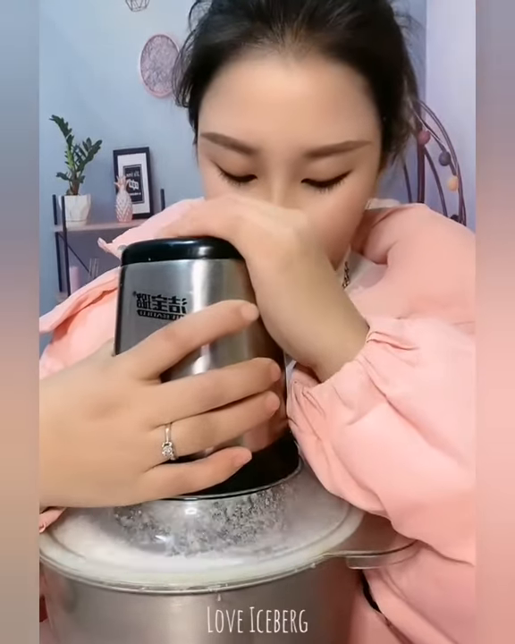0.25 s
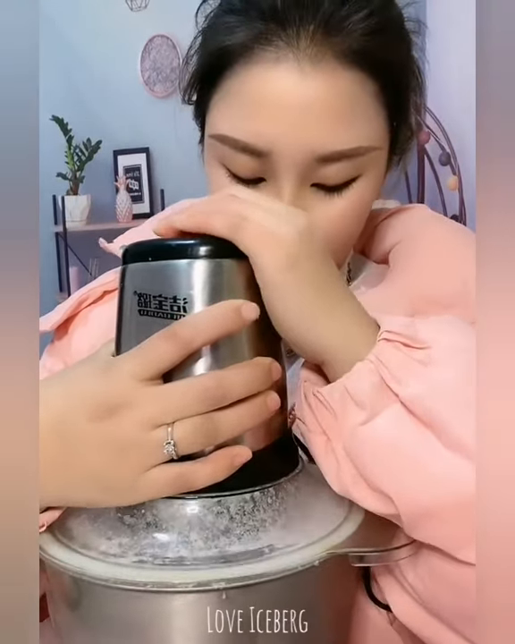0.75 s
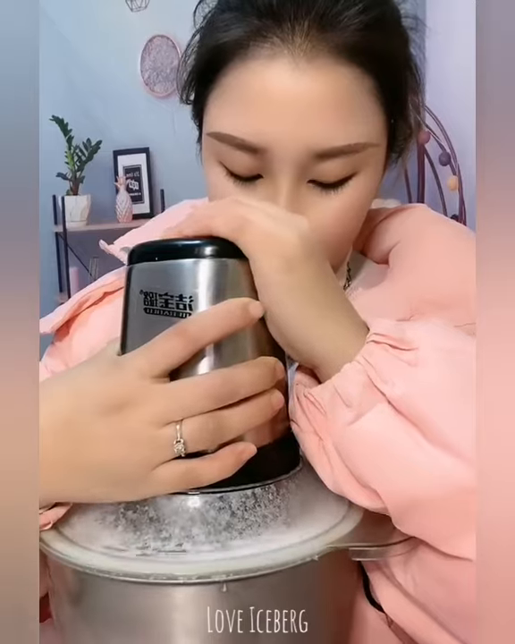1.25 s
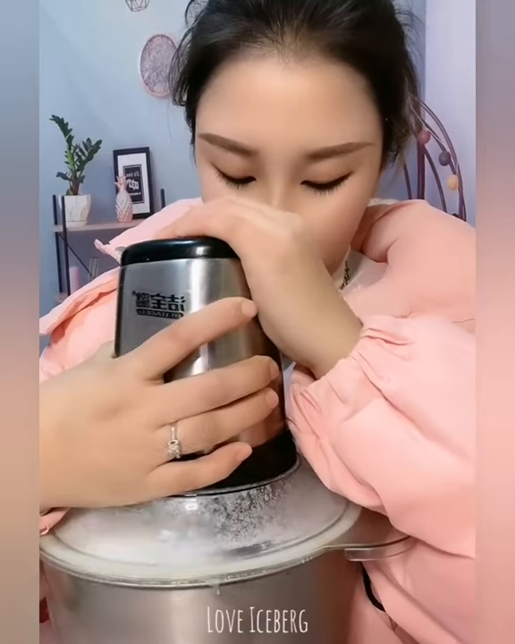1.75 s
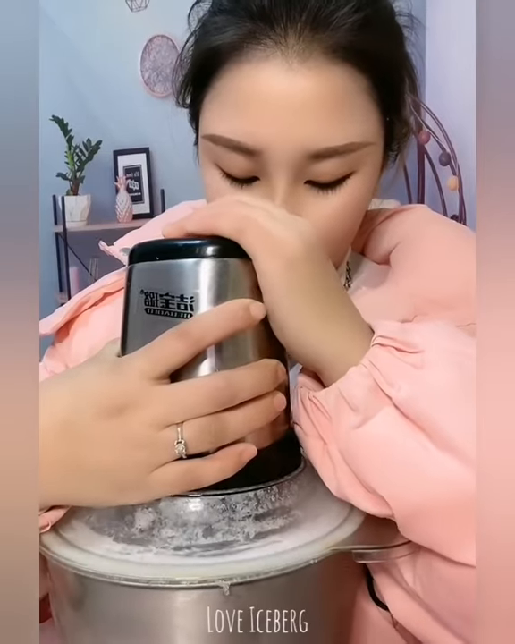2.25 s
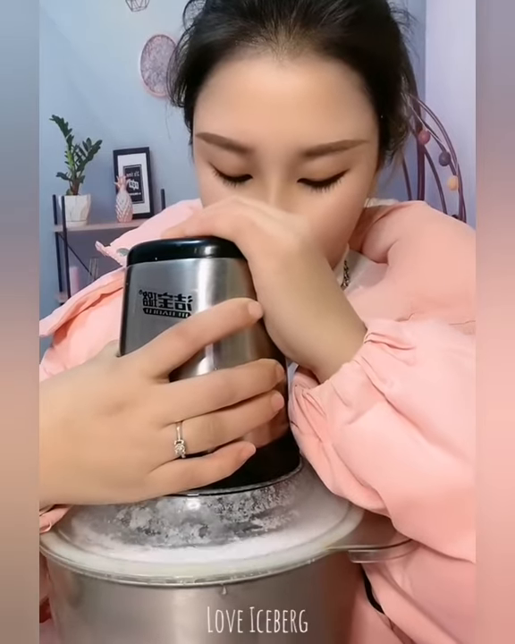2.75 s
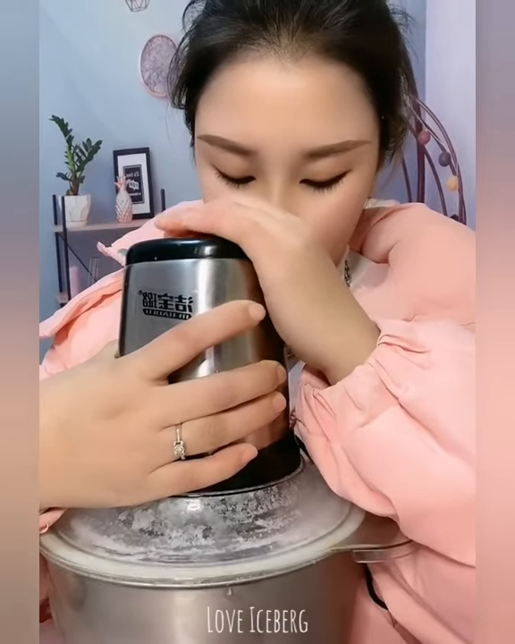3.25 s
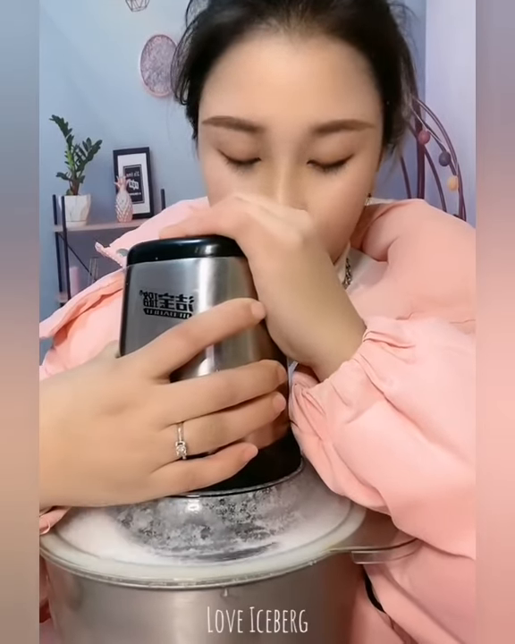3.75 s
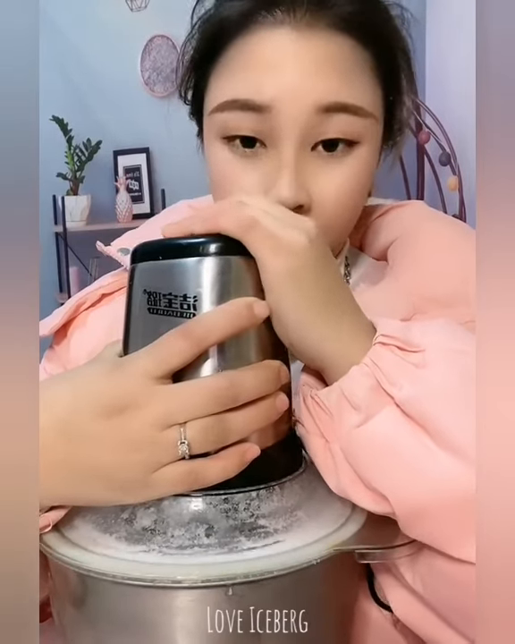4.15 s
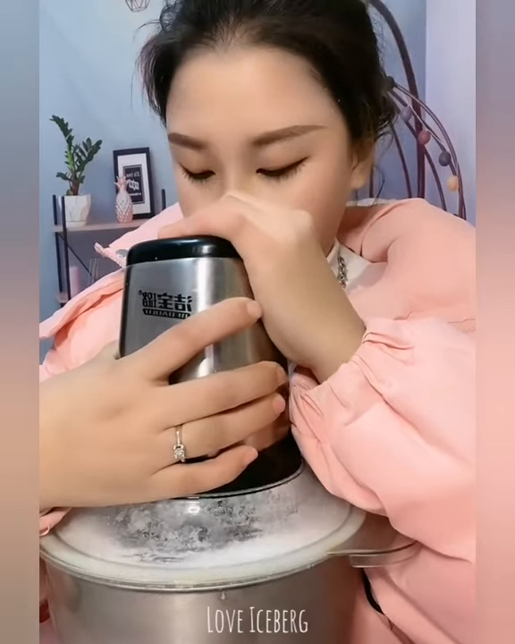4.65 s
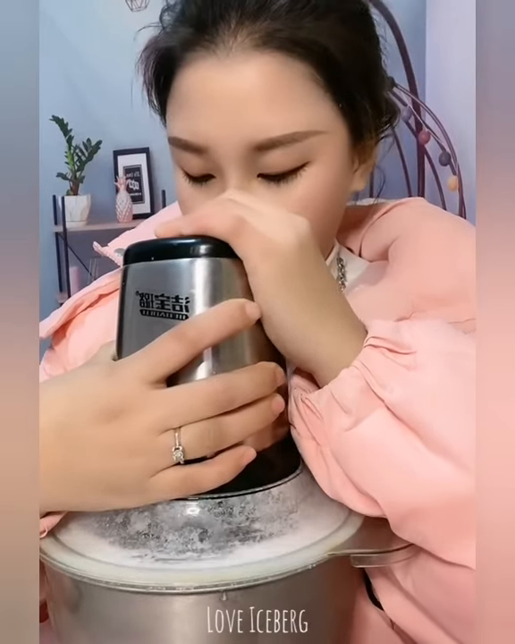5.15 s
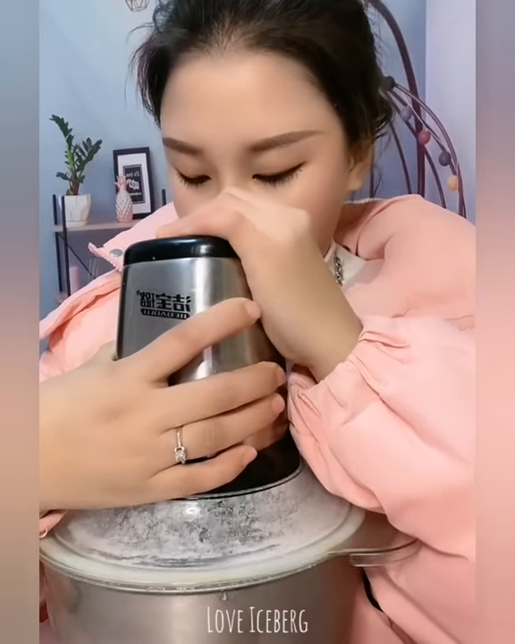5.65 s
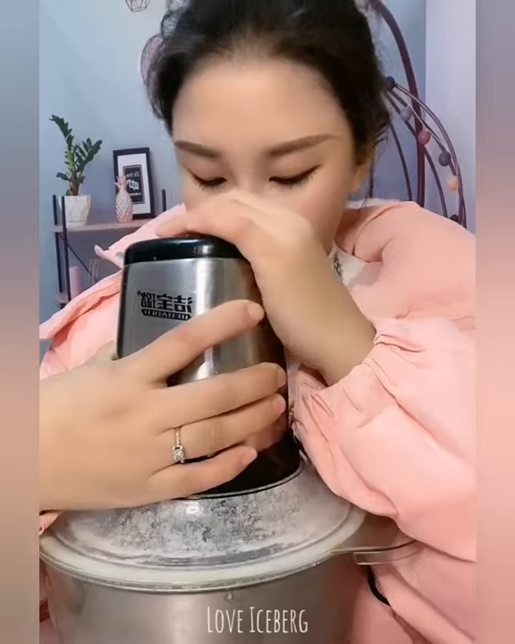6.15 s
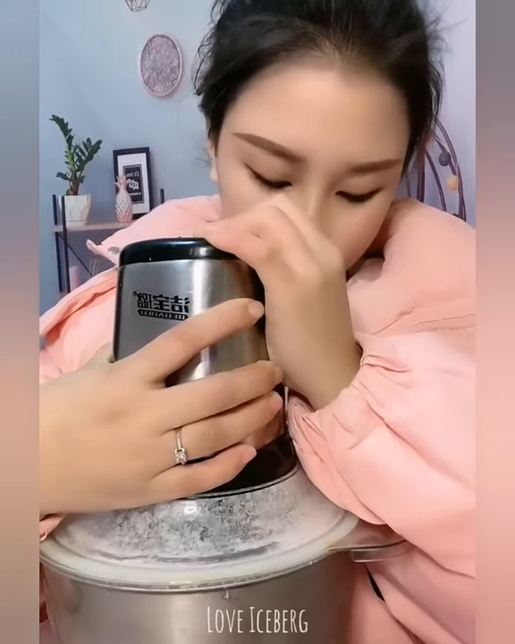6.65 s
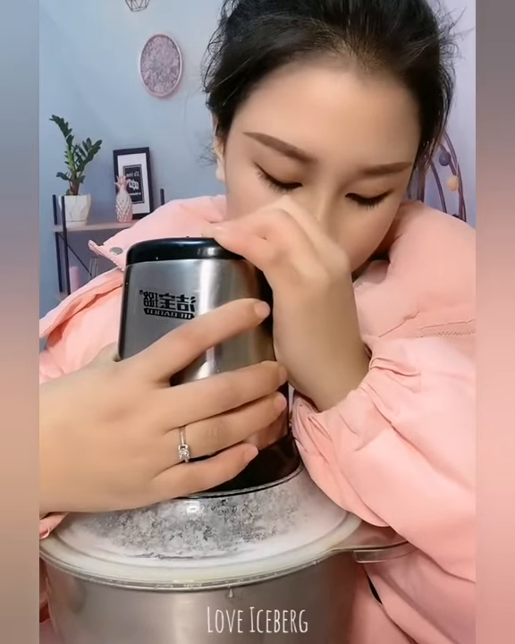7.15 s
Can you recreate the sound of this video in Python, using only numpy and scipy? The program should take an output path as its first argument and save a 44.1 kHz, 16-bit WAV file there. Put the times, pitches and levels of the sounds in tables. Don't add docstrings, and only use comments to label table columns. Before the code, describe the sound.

A faint tick of settling ice in a quiet room, then at 0.1 s an electric chopper bites into ice in a steel bowl: a sharp crack, a knock, and a loud coarse roar, fluttering about fifty times a second, until 0.6. More presses follow at 0.9-1.3, 1.7-2.2, 2.6-3.1, 3.5-4.1, 4.5-5.2 and 5.5-6.1, with the longest from 6.4 to 7.3. Each jolts in suddenly, dips briefly and swells as the high motor whine climbs and sinks beneath the grinding. Bowl and lid ring harshly; lumps thud on the wall and brittle cracks spit through. After each release the blades growl down for 0.1-0.2 s, last pieces crack, and a low bowl hum near 200 Hz dies quickly. Loose ice slides softly around 1.6, 2.5 and 3.4. The close microphone overloads on peaks; the final run-down fades toward room quiet.

```python
import sys
import numpy as np
from scipy import signal
from scipy.fft import rfft, irfft
from scipy.io import wavfile
from scipy.ndimage import uniform_filter1d

SR = 44100
rng = np.random.default_rng(int(sys.argv[2]) if len(sys.argv) > 2 else 0)


def to_wav(sig):
    pcm = np.clip(np.atleast_2d(sig), -1, 1) * 32767
    pcm = np.round(pcm).astype(np.int16)
    wavfile.write(sys.argv[1], SR, pcm.T)


def how_loud(loudness_db):
    steps = np.asarray(loudness_db, float) / 20
    return 10 ** steps


N = 326781

# on/s, off/s, blades stall/s, load/dB, ice against the lid/dB
PULSES = [
    (-.9, -.4, -.17, 2, 0),
    (.125, .62, .75, -.5, -3),
    (.934, 1.31, 1.422, -1, .5),
    (1.713, 2.2, 2.41, -.3, .3),
    (2.587, 3.08, 3.285, 0, .5),
    (3.508, 4.14, 4.305, 0, -1),
    (4.535, 5.165, 5.35, .5, -2),
    (5.51, 6.1, 6.255, .3, -2.5),
    (6.44, 7.283, 7.45, .5, .7),
]
# f/Hz, width/Hz, level/dB
BODY = [(266, 13, 4.5), (334, 41, 6), (453.4, 76, 7), (550, 23, 3.5), (705, 26, 5.5), (772, 80, 7),
        (1113, 87, 11), (1123, 66, 3), (1260, 70, 10), (1667, 136, 5), (1985, 230, 6.5), (3240, 50, 7),
        (3480, 120, 4), (4270, 130, 4.5), (4950, 90, 5.5), (5890, 630, -2.5)]
# f/Hz, level/dB per Hz
COLOUR = [(15, -75), (25, -31), (102, -13), (161, -14.5), (325, -4.5), (638, -10.5), (770, -5), (982, -13),
          (1150, -9.5), (2150, -16.5), (2810, -15.5), (5680, -16), (10800, -33), (15800, -56.5)]
# t/s, crack/dB, sharpness/dB, knock/dB, knock/Hz
BITES = [(.129, -.5, -10, 7, 590), (.937, -5, -6, 8.5, 485), (1.7165, 4, -11, 2, 760),
         (2.5905, -2.5, -16, 6, 790), (3.511, -4, -4.5, 4, 334), (4.5361, 5, -5, 2.5, 258),
         (5.5124, -2, -10, 5, 444), (6.4408, -14, -18, 1, 770)]
# t/s, peak level/dB, f/Hz, sharpness/dB
CRACKS = [(.1123, -17, 5400, -15), (.2448, -10, 4220, -16), (.6802, -5.5, 4320, -12),
          (.7386, 0, 3030, -11.5), (.9708, 2.5, 3400, -14), (1.0166, -9, 2470, -3),
          (1.3414, -5.5, 3320, -13), (1.411, 4.5, 4470, -13.5), (1.452, -11, 6440, -11),
          (2.274, 0, 4370, -10), (2.36, -2.5, 3700, -20), (2.4026, -1.5, 3130, -11),
          (2.6235, -2.5, 4120, -16), (2.6524, -.5, 4900, -17), (2.796, -7, 2770, -17), (3.2, -9, 5000, -8),
          (3.256, -5, 3610, -7.5), (3.278, -8, 5000, -8), (3.668, -9, 5000, -9), (4.2583, -2, 4680, -13),
          (4.2778, 1, 4460, -11.5), (4.593, -3, 4970, -16), (4.6314, -6, 4260, -18), (4.995, -3, 3480, -21),
          (5.122, -9, 6000, -7), (5.22, -9, 6000, -7), (5.3296, -3.5, 3480, -8.5), (5.5054, -5, 2760, -10),
          (6.2434, 2, 5170, -14), (6.486, 3, 3140, -18)]
# t/s, peak level/dB, f/Hz, sharpness/dB
TICKS = [(.0535, -24, 2100, -21), (1.546, -5, 1600, -31), (1.5683, -7, 2200, -29), (1.667, -7, 1600, -31),
         (1.6915, -28, 3390, -5), (2.4932, -6, 2300, -28), (3.397, -7, 2000, -20), (3.4685, -32, 4400, -10),
         (4.5134, -27, 3400, -16), (5.4844, -33, 3500, -9), (6.416, -24, 900, -30)]


def rms_one(x):
    return x / np.sqrt(np.mean(x ** 2) + 1e-20)


def drift(rate_hz):
    r = np.exp(-2 * np.pi * rate_hz / SR)
    slow = signal.lfilter([1], [1, -2 * r, r * r], rng.standard_normal(N + SR))
    return rms_one(slow[SR:])


def resonance(x, hz, width_hz):
    r = np.exp(-np.pi * width_hz / SR)
    poles = [1, -2 * r * np.cos(2 * np.pi * hz / SR), r * r]
    return signal.lfilter([(1 - r * r) / 2, 0, (r * r - 1) / 2], poles, x)


def low_pass(x, order, top_hz):
    return signal.sosfilt(signal.butter(order, top_hz, fs=SR, output="sos"), x)


def band(x, low_hz, high_hz):
    return rms_one(signal.sosfilt(signal.butter(3, [low_hz, high_hz], "band", fs=SR, output="sos"), x))


def coloured(x, spectrum, peaks=()):
    size = 2 ** 13
    hz = np.maximum(np.arange(size // 2 + 1) * SR / size, 1)
    points = np.array(spectrum)
    level_db = np.interp(np.log(hz), np.log(points[:, 0]), points[:, 1])
    for centre_hz, width_hz, db in peaks:
        level_db += db / (1 + (2 * (hz - centre_hz) / width_hz) ** 2)
    cepstrum = irfft(np.log(how_loud(level_db)))
    cepstrum[1:size // 2] *= 2
    cepstrum[size // 2 + 1:] = 0
    response = irfft(np.exp(rfft(cepstrum)))
    return signal.fftconvolve(x, response)[:N]


def blade_blows(uneven, spread_db, fade_s):
    blade_hz = 48.23
    passes = np.cumsum(blade_hz * (1 + uneven * drift(13))) / SR
    kicks = np.diff(np.floor(passes), prepend=0) > 0
    force = kicks * how_loud(spread_db * rng.standard_normal(N))
    r = np.exp(-1 / (fade_s * SR))
    return rms_one(signal.lfilter([1], [1, -2 * r, r * r], force))


def bowl_hum():
    hz, width_hz = 202.3, 8.4
    hum = resonance(resonance(rng.standard_normal(N), hz, width_hz), hz, 3 * width_hz)
    return hum / np.sqrt(uniform_filter1d(hum ** 2, size=3000) + 1e-12)


def churn():
    # f/Hz, width/Hz, level/dB
    ridges = [(3480, 110, -5), (4270, 130, -5), (1650, 120, -8)]
    ridge_patchy_db, lurch_db = 5, 1.5
    dulling, dull_hz = .4, 560
    bowl_db, lid_db, crunch_db, swish_db, rumble_db, hum_db = churn_levels()

    blows = blade_blows(uneven=.3, spread_db=2.0, fade_s=0.003)
    grain_force = how_loud(4.4 * np.minimum(rng.exponential(1, N), 5))
    grains = (rng.random(N) < 4000 / SR) * grain_force * rng.choice([-1, 1], N)
    grind = rng.standard_normal(N) + 0.46 * rms_one(grains)
    lumps = coloured((1.9 + blows) * grind, COLOUR, BODY)
    slush = coloured((2.45 + blows) * grind, COLOUR, BODY)

    dull_db = dulling * np.clip(crunch_db + 20, -18, 0)
    bowl = band(lumps, 225, 980)
    belly = low_pass(bowl, 1, dull_hz)
    bowl = how_loud(-dull_db / 2) * belly + how_loud(dull_db) * (bowl - belly)
    lid = band(lumps, 980, 1420)
    rumble = how_loud(lurch_db * drift(4)) * band(lumps, 25, 160)
    crunch, swish = band(slush, 1420, 6800), band(slush, 6800, 17000)
    ringing = np.zeros(N)
    for hz, width_hz, db in ridges:
        ringing += how_loud(db + dull_db + ridge_patchy_db * drift(3)) * resonance(crunch, hz, width_hz)
    crunch = crunch + ringing

    out = how_loud(bowl_db - 0.5) * bowl + how_loud(lid_db + 3.4) * lid
    out += how_loud(rumble_db + 1.0) * rumble + how_loud(hum_db - 2.2) * bowl_hum()
    return out + how_loud(drift(12)) * (how_loud(crunch_db - 1) * crunch + how_loud(swish_db) * swish)


def churn_levels():
    # running/dB, first jolt/dB, slump after it/dB, change by release/dB
    driven = [
        (-14, 3, -5, .4),
        (-17.2, 1.5, -2.5, -1.3),
        (-18.3, 3, -4, -.6),
        (-26.3, .5, -1.5, -3),
        (-29, -8, 5, -1.5),
        (-29.5, -3, 5, -2.5),
    ]
    # change while coasting/dB, drop at the stall/dB, fall/dB per s, rest/dB
    released = [
        (-3, -3, -150, -52),
        (-7, -11, -130, -60),
        (-6, -10.5, -60, -57),
        (-3.5, -7.5, -40, -76),
        (4, -.5, -70, -50),
        (10.5, -.5, -70, -52),
    ]
    # bowl hum at the stall/dB, table rumble/dB, fineness of the ice/dB, settling speed
    endings = [(-2, -10, 0, 1.1), (1, 2, -.3, .8), (-5, -1, -.5, .85), (3, -1, 0, 1.1), (-3, -3, 0, 1.15),
               (-4, 0, 0, 1.0), (-4, 3, .6, 1.0), (3, -1, 0, 1.25), (-2, -2, -1.8, 1.1)]
    # t/s, length/s, level/dB
    slides = [(1.555, .035, -12), (1.66, .025, -16), (2.52, .04, -14), (3.385, .025, -14)]
    slide_colour_db = [-2.5, -4, -6, -25, -30, -30]
    stand_db = [0, -2, -10, -20, -3, 0]
    stand_s, drop_s = .115, .022
    lead_s, lead_db, slump_s, run_up_s = .013, -27, .035, .1
    let_go_s, let_go_share = .03, .4

    t, out = np.arange(0, N, 20) / SR, []
    for k, ((run, jolt, slump, change), (coast, drop, fall, rest)) in enumerate(zip(driven, released)):
        power = np.full(len(t), how_loud(2 * rest))
        for (on, off, stall, load_db, lid_db), (hum_db, rumble_db, fine_db, settle) in zip(PULSES, endings):
            own_db = [0, lid_db, fine_db, fine_db, rumble_db, 0][k]
            let_go_db = change + let_go_share * coast
            last_db = change + coast + hum_db * (k == 5)
            times = [on - 2 * lead_s, on - lead_s, on - .004, on + .001, on + slump_s, on + run_up_s,
                     off, off + let_go_s, stall]
            levels = [-60, lead_db, lead_db + 11, jolt, slump, 0, change, let_go_db, last_db]
            still = np.maximum(t - stall, 0) * settle
            shape_db = np.interp(t, times, levels)
            shape_db += stand_db[k] * np.clip((still - stand_s) / drop_s, 0, 1)
            shape_db += drop * (1 - np.exp(-still / drop_s)) + fall * still
            power += how_loud(2 * (run + load_db + own_db + shape_db))
        for s, length_s, db in slides:
            power += how_loud(2 * (run + db + slide_colour_db[k])) * np.exp(-((t - s) / length_s) ** 2 * 2)
        out.append(np.interp(np.arange(N) / SR, t, 10 * np.log10(power)))
    return out


def hits(events, rise_s, fade_s, cycles, noisy, top_hz, gain_db):
    t = np.arange(2000) / SR
    swell = np.exp(-t / fade_s) * np.minimum(t / rise_s, 1)
    bursts = rng.standard_normal((len(events), len(t))) * swell
    pitched, force = np.zeros(N + len(t)), np.zeros(N + len(t))
    for (s, db, hz, *_), burst in zip(events, bursts):
        start = round(s * SR)
        i = slice(start, start + len(t))
        ring = resonance(resonance(burst, hz, hz / cycles), hz, hz / 0.5)
        pitched[i] += how_loud(db) * ring / np.abs(ring).max()
        force[i] += how_loud(db) * burst
    soft = low_pass(force[:N], 2, top_hz)
    return how_loud(gain_db) * (pitched[:N] + noisy * coloured(soft, COLOUR, BODY))


def splinters(cracks):
    splinter_db = -5
    force = np.zeros(N)
    for s, db, _, sharp_db in cracks:
        force[round(s * SR)] = how_loud(db + sharp_db + splinter_db)
    r = np.exp(-1 / (.0012 * SR))
    swell = signal.lfilter([(1 - r) * np.e], [1, -2 * r, r * r], force)
    return swell * band(rng.standard_normal(N) + 1e-18, 5700, 9850)


def ice_cracks():
    bite_hz = 3700
    splits = [(s, db, bite_hz, sharp_db) for s, db, sharp_db, *_ in BITES] + [*CRACKS]
    cracks = hits(splits, rise_s=0.00096, fade_s=0.0031, cycles=2.4, noisy=0.2, top_hz=14000, gain_db=-6)
    return cracks + splinters(splits + [*TICKS])


def wall_knocks():
    # t/s, peak level/dB, f/Hz
    lumps = [(.243, 2, 734), (.276, 2, 401), (.307, 4.5, 783), (.51, 3, 776), (.572, 4, 744),
             (.654, 2, 333), (.792, -9, 308), (.988, -.5, 730), (1.341, 3, 740), (1.411, 4, 405),
             (1.545, -4.5, 800), (1.644, -16, 799), (2.311, 5, 440), (2.402, -1.5, 263), (3.113, 5, 740),
             (3.263, 5, 660), (3.62, 1, 345), (3.668, 1.5, 721), (3.728, 5.5, 780), (4.284, 5.5, 262),
             (5.227, 4, 706), (5.335, -.5, 268), (5.678, 4.5, 770), (6.078, 3, 686), (6.131, 5, 408),
             (6.236, -1.5, 260), (6.554, 4, 785), (7.07, 4, 790), (7.305, 4.5, 730), (7.343, 1.5, 393)]
    thuds = [(s - .002, db, hz) for s, *_, db, hz in BITES] + [*lumps]
    return hits(thuds, rise_s=0.0034, fade_s=0.0037, cycles=7.6, noisy=1.0, top_hz=3500, gain_db=-8)


def motor():
    # full speed f/Hz, spin-up/s, level/dB, time until ice buries it/s
    presses = [(3030, .062, -35.5, .5), (3030, .055, -33, .6), (3060, .06, -32.5, .76),
               (3050, .062, -33, .6), (3030, .055, -34.5, .35), (3080, .052, -33, .4),
               (3080, .048, -33.5, .32), (3060, .046, -34.5, .4)]
    # multiple of f, level/dB
    whine = [(1, 0), (.957, -3), (1.043, -9), (2, -3.5), (1.957, -4.5), (2.043, -8), (1.913, -8),
             (1.87, -10), (.125, 9)]
    # f/Hz, width/Hz, level/dB
    housing = [(2550, 1400, 10.5), (5050, 400, 5), (5750, 800, 7)]
    brush_db, coast_db = -1.2, 7
    t, out = np.arange(N) / SR, np.zeros(N)
    waver = 1 + .005 * drift(120)
    flutter = [how_loud(2.5 * drift(14)) * (.8 + .6 * drift(80)) for _ in whine]
    sparking, judder = drift(500), drift(350)
    for (on, off, *_), (full_hz, spin_s, db, buried_s) in zip(PULSES[1:], presses):
        i = slice(int(on * SR), min(N, int((off + .25) * SR)))
        since = t[i] - on
        coast = np.exp(-np.maximum(t[i] - off, 0) / .11)
        speed = (1 - .45 * np.exp(-since / spin_s) - .18 * np.exp(-since / (5 * spin_s))) * coast
        phase = 2 * np.pi * np.cumsum(full_hz * speed * waver[i]) / SR
        tone = np.zeros(len(phase))
        for (k, level_db), f in zip(whine, flutter):
            tone += how_loud(level_db) * f[i] * coast ** (4 * k) * np.sin(k * phase)
        clear = 0.15 + 0.71 * np.exp(-(since / buried_s) ** 4)
        haze = how_loud(brush_db) * sparking[i] * coast ** 6 * np.sin(1.95 * phase)
        growl = how_loud(coast_db) * judder[i] * 7 * coast * (1 - coast) ** 2 * np.sin(phase)
        out[i] += how_loud(db) * (clear * tone + haze + growl)
    return coloured(out, [(20, 0), (20000, 0)], housing)


def shard_ticks():
    return hits(TICKS, rise_s=.001, fade_s=.0035, cycles=2.4, noisy=.7, top_hz=6000, gain_db=-9)


def room_tone():
    # f/Hz, level/dB per Hz
    spectrum = [(35, -35), (60, -11), (199, 1), (895, -21), (1450, -26), (1880, -35), (4410, -25),
                (15000, -42)]
    return how_loud(-58) * rms_one(coloured(rng.standard_normal(N), spectrum))


def scene():
    ice = churn() + ice_cracks() + wall_knocks() + shard_ticks()
    return np.tile(ice + motor() + room_tone(), (2, 1))


def top_cut(x):
    return signal.sosfilt(signal.butter(12, 15980, fs=SR, output="sos"), x)


def record(dry):
    overload, cutoff_hz = 1.0, 15950
    clipped = overload * np.tanh((np.abs(dry) / overload) ** 5) ** (1 / 5) * np.sign(dry)
    steep = signal.cheby2(12, 60, cutoff_hz + 750, fs=SR, output="sos")
    return top_cut(signal.sosfilt(steep, clipped))


dry = scene()
out = record(dry)
to_wav(out)
```